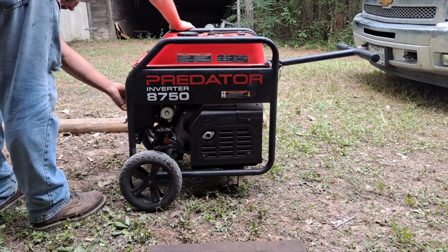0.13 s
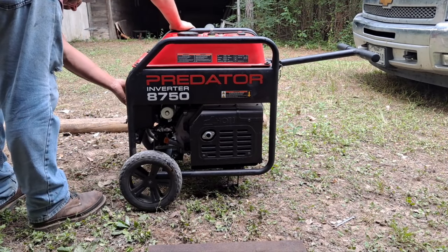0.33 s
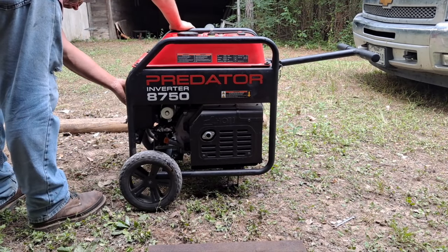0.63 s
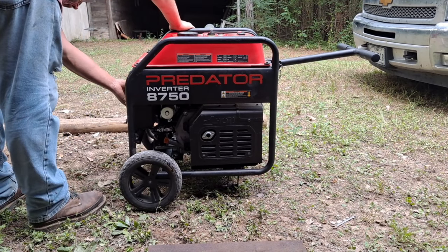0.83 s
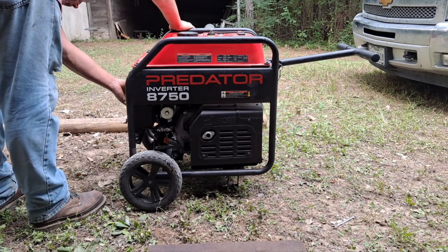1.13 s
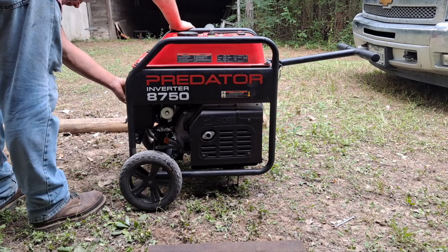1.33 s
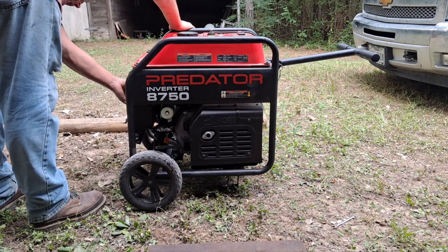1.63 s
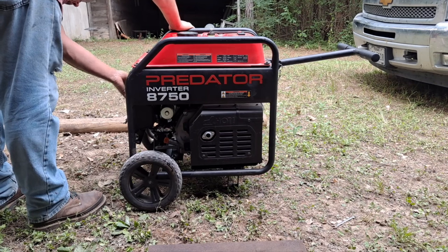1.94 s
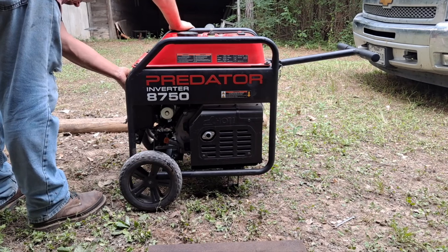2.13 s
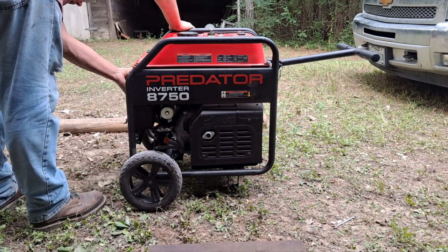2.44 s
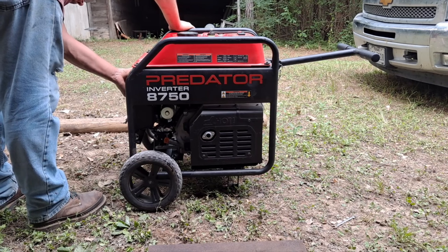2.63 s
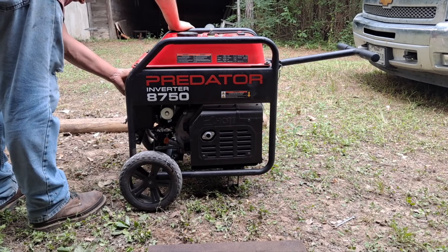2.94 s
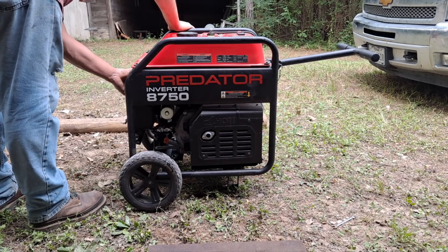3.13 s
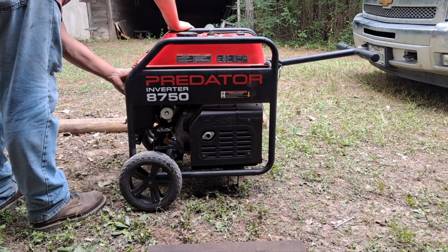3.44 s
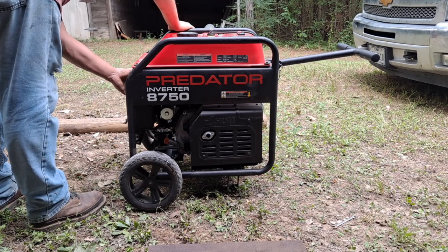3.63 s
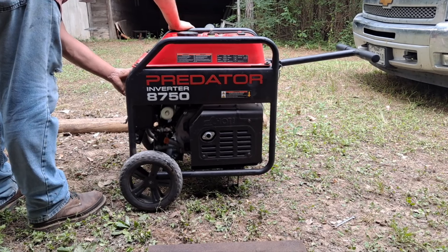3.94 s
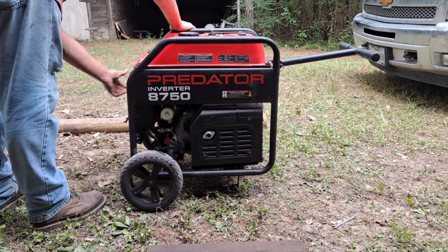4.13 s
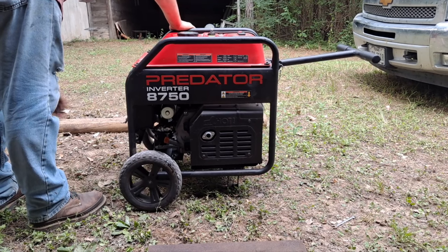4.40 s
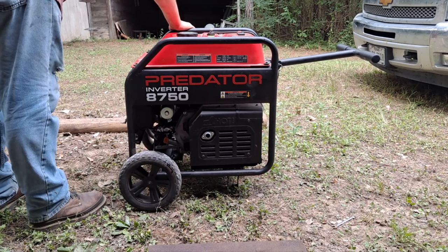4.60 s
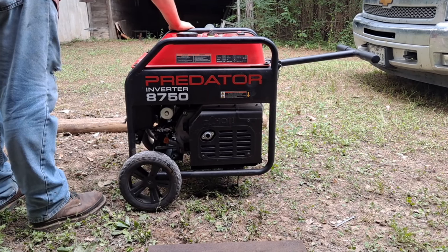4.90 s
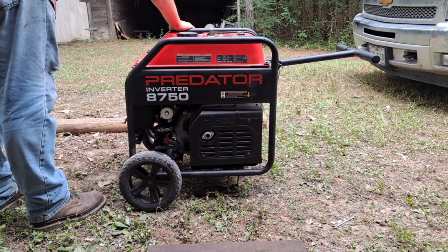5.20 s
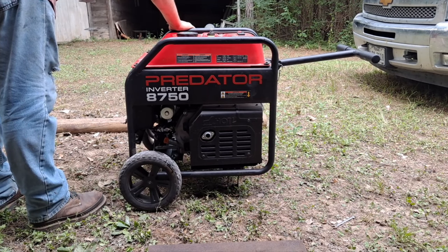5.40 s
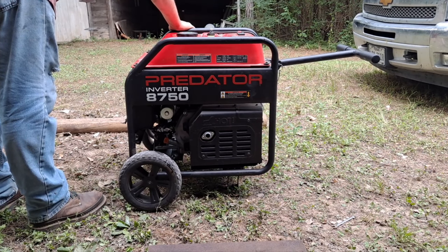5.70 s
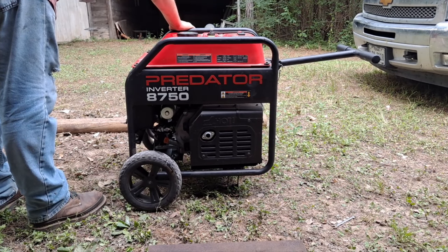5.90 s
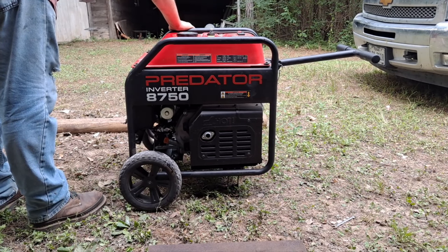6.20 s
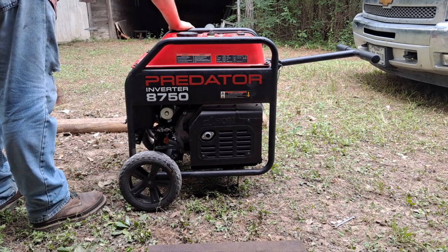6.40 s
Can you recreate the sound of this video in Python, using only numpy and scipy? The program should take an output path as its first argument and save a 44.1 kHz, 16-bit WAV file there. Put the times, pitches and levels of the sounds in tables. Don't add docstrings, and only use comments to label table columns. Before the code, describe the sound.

Quiet insect hiss and small panel taps, then a starter slams and grinds, and a generator engine catches loudly, races, sags and revs again.

```python
import sys
import numpy as np
from scipy import signal
from scipy.fft import rfft, irfft
from scipy.io import wavfile
from scipy.ndimage import map_coordinates

SR = 44100
rng = np.random.default_rng(int(sys.argv[2]) if len(sys.argv) > 2 else 0)


def inscribe(sig):
    pcm = np.round(np.clip(np.atleast_2d(sig).T, -1, 1) * 32767)
    wavfile.write(sys.argv[1], SR, pcm.astype(np.int16))


def nominal_scale(level):
    x = np.asarray(level, float) / 20
    return 10 ** x


N = 288855
TIME_S = np.arange(N) / SR
GRID_HZ = np.maximum(np.fft.rfftfreq(N, 1 / SR), 1)


def rms_one(x):
    return x / np.sqrt(np.mean(x ** 2) + 1e-20)


def in_time(rows):
    at_s, *columns = np.transpose(rows)
    return [np.interp(TIME_S, at_s, column) for column in columns]


def at_hz(points):
    hz, value = np.array(points).T
    return np.interp(np.log(GRID_HZ), np.log(hz), value)


def bump(hz, width_hz, db):
    return db / (1 + (2 * (GRID_HZ - hz) / width_hz) ** 2)


def drift(rate_hz):
    knots = rng.standard_normal(4000)
    return map_coordinates(knots, [TIME_S * 2 * rate_hz], order=3)


def swells(peak_s, peak_db, rise_s, fall_s):
    t = TIME_S[::64, None] - peak_s
    bells = nominal_scale(2 * peak_db) * np.exp(-2 * (t / np.where(t < 0, rise_s, fall_s)) ** 2)
    return np.interp(TIME_S, TIME_S[::64], np.sqrt(bells.sum(axis=1)))


def wavering_tone(hz, width_hz):
    phase = 2 * np.pi * np.cumsum(hz * np.ones(N)) / SR
    return rms_one(drift(width_hz / 2) * np.sin(phase) + drift(width_hz / 2) * np.cos(phase))


# freq [hz], left_lead [radians]
PORT_LEAD = [(60, 0.5), (550, 0.24), (1460, .5), (1900, -0.37), (2840, 0.67), (3700, 1.26), (5000, 0),
             (8000, 3.5), (15000, -0.4)]


def stereo_noise(colour_db, likeness, balance, grain_db):
    grains = rng.standard_normal((2, N)) * nominal_scale(grain_db * drift(120))
    mid, side = rfft(grains) * nominal_scale(colour_db)
    alike = np.clip(at_hz(likeness), -1, 1)
    tilt = nominal_scale(at_hz(balance) / 2)
    shared, apart = np.sqrt(1 + alike) * mid, np.sqrt(1 - alike) * side
    left = (shared + apart) * tilt * np.exp(1j * at_hz(PORT_LEAD))
    right = (shared - apart) / tilt
    out = irfft(np.array([left, right]), N)
    return out / np.sqrt(np.mean(out.mean(0) ** 2))


# freq [hz], width [hz], boost [db]
FRAME = [(530, 40, 8), (803, 60, 7), (1092, 20, 7), (1335, 40, 3), (1540, 40, 3), (2850, 110, 5),
         (3630, 120, 5), (5600, 200, 5), (7250, 150, 2), (7900, 300, 2)]
# freq [hz], width [hz], dip [db]
GROUND_DIP = (438, 47, -10)
# freq [hz], likeness [-1..1]
NEAR_LIKENESS = [(60, 1), (250, 1), (550, 0.75), (1100, 0.89), (2200, 0.33), (4500, 0.43), (8000, 0.12),
                 (15000, .15)]
# freq [hz], left_minus_right [db]
NEAR_BALANCE = [(60, -11), (130, -8), (290, -3), (640, -3), (1410, -1.0), (3100, 1), (6820, -5),
                (15000, -0.5)]


def machine_noise(spectrum, level_db, edge_db, treble_db, grain_db):
    colour_db = at_hz(spectrum) + sum(bump(*mode) for mode in FRAME) + bump(*GROUND_DIP)
    x = rfft(stereo_noise(colour_db, NEAR_LIKENESS, NEAR_BALANCE, grain_db))
    above_edge, above_treble = [1 / (1 + (corner_hz / GRID_HZ) ** 8) for corner_hz in (1900, 4700)]
    body = rms_one(irfft(x * (1 - above_edge), N))
    edge = rms_one(irfft(x * (above_edge - above_treble), N))
    treble = rms_one(irfft(x * above_treble, N))
    return nominal_scale(level_db) * (body + nominal_scale(edge_db) * edge + nominal_scale(treble_db) * treble)


def puffs(times_s, peak_db, hz, cycles, skew, turn):
    train = np.zeros((1, N))
    keep = times_s < TIME_S[-1]
    train[0, np.round(times_s[keep] * SR).astype(int)] = nominal_scale(peak_db[keep])
    t = np.arange(-900, 901) / SR
    swing = np.cos(2 * np.pi * hz * t - skew - turn * np.array([[-1], [1]]))
    shape = swing * np.exp(-(t * hz / cycles) ** 2)
    return signal.fftconvolve(train, shape, axes=1)[:, 900:N + 900]


def strikes(events, modes, rub_s, body_db):
    at_s, peak_db, crack_db = np.transpose(events)
    at = np.round(at_s * SR).astype(int)
    end, ring_end = at[-1] + SR // 4, SR * 4
    rub = rng.standard_normal((2, N))
    fading = [1, -nominal_scale(-60 / (rub_s * SR))]
    out = np.zeros((2, N))
    for hz, level_db, t60_s in modes:
        r, w = nominal_scale(-60 / (t60_s * SR)), 2 * np.pi * hz / SR
        luck_db = rng.normal(0, 3.0, (len(at), 2)).T
        blows = np.full((2, N), 1e-18)
        blows[:, at] = nominal_scale(peak_db + level_db + body_db + luck_db)
        pushed = signal.lfilter([1], fading, blows[:, :end]) * rub[0, :end]
        pushed = np.pad(pushed, ((0, 0), (0, ring_end - end))) + 1e-18
        out[:, :ring_end] += signal.lfilter([0, np.sin(w)], [1, -2 * r * np.cos(w), r * r], pushed)
    blows = np.zeros(N)
    blows[at] = nominal_scale(peak_db + crack_db)
    return out + rub * signal.lfilter([1], fading, blows)


# start_s [s], rate [four-stroke cycles/s]
SPEED = [(3.76, 5.9), (3.894, 6.13), (4.087, 10.41), (4.201, 16.02), (4.524, 27.34), (4.818, 27.35),
         (5.139, 25.35), (5.676, 23.66), (5.872, 21.51), (6.174, 23.84), (6.6, 23.4)]


def crank():
    at_s, rate = np.transpose(SPEED)
    t = np.arange(at_s[0], at_s[-1], 1 / SR)
    done = np.cumsum(np.interp(t, at_s, rate)) / SR
    pops_s = np.interp(np.arange(int(done[-1]) + 1), done, t)
    period_s = np.append(np.diff(pops_s), 0.043)
    cycle = np.interp(TIME_S, pops_s, np.arange(len(pops_s)), left=-1)
    return pops_s, period_s, cycle, in_time(SPEED)[0]


def exhaust(pops_s, period_s, flow_db, load_db, luck):
    catch_s, misfire_db = 4.1, -7.5
    flow_db, load_db = np.interp(pops_s, TIME_S, flow_db), np.interp(pops_s, TIME_S, load_db)
    pop_db = -7.5 + 0.37 * flow_db + 0.72 * load_db
    pop_db += misfire_db * (pops_s < catch_s) + 0.12 * luck[0]
    pop_db -= 0.025 * flow_db * luck[2]
    lean_db = pop_db - 16 - 0.3 * flow_db
    after_db = pop_db - 6.5 + 0.13 * flow_db
    out = puffs(pops_s, pop_db, hz=234.0, cycles=0.61, skew=-0.017, turn=0.14)
    out += puffs(pops_s + 0.268 * period_s, after_db, hz=240, cycles=0.51, skew=0.16, turn=0.28)
    out += puffs(pops_s + 0.55 * period_s, pop_db - 5.5, hz=213, cycles=0.3, skew=0.95, turn=0.19)
    out += puffs(pops_s - 0.009, lean_db - 3.0, hz=182, cycles=0.71, skew=0.18, turn=0.27)
    out += puffs(pops_s, lean_db + 0.27, hz=325, cycles=1.47, skew=0.13, turn=0.14)
    return out * nominal_scale([[-1.5], [1.5]])


def valve_thump(pops_s, period_s, thump_db, luck):
    peak_db = np.interp(pops_s, TIME_S, thump_db) - 3.5 + 0.52 * luck[1]
    thump = puffs(pops_s - 0.275 * period_s, peak_db, hz=117, cycles=0.57, skew=1.68, turn=0.75)
    return thump * nominal_scale([[-2.5], [2.0]])


# peak_s [s], peak_db [db], spread_s [s]
LABOURS = [
    (3.92, -23, .04),
    (4.04, -20, .04),
    (4.2, -24, .12),
    (4.785, -19.5, .02),
    (4.97, -21, .02),
    (5.32, -37, 0.068),
    (5.73, -19.5, .07),
    (5.85, -20, 0.077),
]


def intake_boom(pops_s):
    peak_s, peak_db, spread_s = np.transpose(LABOURS)
    gain = np.interp(pops_s, TIME_S, swells(peak_s, peak_db, spread_s, spread_s))
    boom_db = 20 * np.log10(gain + 1e-9)
    return puffs(pops_s - 0.005, boom_db, hz=78, cycles=0.87, skew=0.3, turn=0.5) * nominal_scale([[-4.0], [3.5]])


# order [per cycle], level_db [db re thump], lag [cycles], left_minus_right [db]
LOW_ORDERS = [(2, -19, 0.31, -6), (5, -13, 0.042, 8)]


def block_tones(cycle, thump_db):
    tones = np.zeros((2, N))
    for order, level_db, lag_cycles, pan_db in LOW_ORDERS:
        side_gain = nominal_scale(level_db + np.array([[pan_db / 2], [-pan_db / 2]]))
        tones += side_gain * np.cos(2 * np.pi * order * (cycle - lag_cycles))
    return nominal_scale(thump_db) * np.clip((TIME_S - 4.05) / 0.27, 0, 1) * tones


# freq [hz], density [db per hz]
JET = [(290, 1), (500, -9), (2330, -2), (2890, 1.5), (4150, -5), (5550, -4), (6800, -8.5), (8330, -6),
       (10800, -22.5), (13300, -13), (16000, -24)]


def gas_jet(pops_s, period_s, cycle, flow_db, luck):
    opens_s = pops_s - 0.36 * period_s
    last = np.maximum(np.searchsorted(opens_s, TIME_S) - 1, 0)
    since_cycles = (TIME_S - opens_s[last]) / period_s[last]
    fade_db = -38 * np.maximum(since_cycles - 0.2, 0) + 0.13 * luck[2][last]
    gate = np.clip(since_cycles / 0.016, 0, 1) * nominal_scale(fade_db) * (cycle > 0)
    jet = stereo_noise(at_hz(JET) + bump(15900, 1500, 5), NEAR_LIKENESS, NEAR_BALANCE, grain_db=0.65)
    return jet * gate * nominal_scale(-13.5 + np.interp(pops_s, TIME_S, flow_db)[last])


# freq [hz], density [db per hz]
CLATTER = [(40, -1), (100, -10), (330, -5.5), (600, 0.5), (1000, 1.5), (2000, -0.5), (3000, -4.5),
           (4500, -10), (6500, -12.5), (8500, -11), (10500, -26), (13000, -18), (16000, -24.5)]


def running_clatter(cycle, flow_db, load_db):
    tappet_db = 2.0 * np.cos(2 * np.pi * (cycle - 0.05))
    level_db = -22.5 + load_db + 0.62 * drift(9) + 0.18 * tappet_db
    edge_db, treble_db = -2 + 0.29 * load_db, -5.5 + 0.22 * flow_db + tappet_db
    clatter = machine_noise(CLATTER, level_db, edge_db, treble_db, grain_db=1.0)
    return clatter * np.clip((TIME_S - 3.95) / 0.19, 0, 1)


# start_s [s], gas_flow [db re wide open]
THROTTLE = [(3.76, -41), (4.05, -11), (4.14, -0.5), (4.25, 0), (4.53, -2.5), (4.61, -16.5), (4.78, -29.5),
            (5.2, -34.5), (5.5, -24.5), (5.87, -28), (5.91, -4), (6.05, -8.5), (6.2, -20.5), (6.55, -27)]
# start_s [s], load [db]
LOAD = [
    (3.95, -5.5),
    (4.25, -0.2),
    (4.43, -0.1),
    (5.69, -3),
    (6.0, -0.5),
    (6.45, -0.5),
]


def engine():
    pops_s, period_s, cycle, rate = crank()
    (flow_db,), (load_db,) = in_time(THROTTLE), in_time(LOAD)
    luck = rng.normal(0, 1, (len(pops_s), 3)).T
    thump_db = -14 + 0.23 * flow_db + 0.21 * load_db
    thump_db -= 0.07 * np.maximum(rate - 15.2, 0)
    out = exhaust(pops_s, period_s, flow_db, load_db, luck)
    out += valve_thump(pops_s, period_s, thump_db, luck) + intake_boom(pops_s)
    out += block_tones(cycle, thump_db)
    out += gas_jet(pops_s, period_s, cycle, flow_db, luck)
    return out + running_clatter(cycle, flow_db, load_db)


# start_s [s], peak_db [db], dry_crack [db re peak]
PINION = [
    (2.647, -19, -15.5),
    (2.65, -31, -22),
    (2.667, -15.5, 1.5),
    (2.683, -29, -14),
    (2.695, -7, -15),
    (2.719, -8, -26),
]
# freq [hz], level_db [db], t60_s [s]
HOUSING = [(167.7, -3, 0.54), (254.7, -5.5, 0.91), (329, 3, 0.86), (800, -14, 0.065), (860, -16, 0.26),
           (1056, -3, 0.13), (1560, 11, 0.06), (2200, -7, 0.039), (2920, -14, .06), (3340, -13, 0.073),
           (3630, 7, 0.086), (4780, 7, 0.064), (7600, -11, 0.02), (8130, -19, 0.032), (12600, -18, 0.022)]
# freq [hz], density [db per hz]
GRIND = [(59, -41), (100, -14), (315, -15), (406, -15.5), (547, -5), (818, -3.5), (1200, -5), (2080, -5.5),
         (2370, -6.5), (2800, -7.5), (6150, -14.5), (7940, -9.5), (10700, -29), (15000, -19), (16000, -42)]
# peak_s [s], extra_grind [db]
HEAVES = [
    (2.72, -22.5),
    (2.947, -25),
    (3.187, -29.5),
    (3.413, -30),
    (3.671, -28.5),
    (3.88, -29.5),
    (4.012, -22),
]


def starter():
    engage_s, release_s, coast_end_s = 2.646, 3.715, 4.16
    grind_steady_db, slam_db, slam_s = -26.5, -21, 0.1
    tooth_start_hz, tooth_top_hz, spin_up_s = 1157, 2187, 0.17
    since_s = np.maximum(TIME_S - engage_s, 0)
    coasting = np.clip((TIME_S - release_s) / 0.046, 0, 1)
    engaged = np.clip(since_s / 0.006, 0, 1) * np.clip((coast_end_s - TIME_S) / 0.045, 0, 1)

    heave_s, heave_db = np.transpose(HEAVES)
    slam = nominal_scale(slam_db) * np.exp(-(since_s / slam_s) ** 2)
    heave = swells(heave_s, heave_db, rise_s=0.051, fall_s=0.024)
    grind_db = 20 * np.log10(np.sqrt(nominal_scale(grind_steady_db) ** 2 + slam ** 2 + heave ** 2))
    spun = 1 - np.exp(-(since_s / 0.21) ** 2)
    tint_db = 0.44 * (grind_steady_db - grind_db) - 6 * (1 - spun)
    bite_db = 9 * np.exp(-since_s / 0.041)
    edge_db = 2.5 - 6 * coasting + tint_db + bite_db
    treble_db = -5 - 3 * coasting + tint_db + 2.07 * bite_db
    grind = machine_noise(GRIND, grind_db - 0.3 * coasting, edge_db, treble_db, grain_db=1.0)

    sag = swells(heave_s + 0.085, 0 * heave_db, 0.054, 0.054)
    climb = np.exp(-np.maximum(since_s - 0.085, 0) / spin_up_s)
    tooth_hz = (tooth_top_hz - (tooth_top_hz - tooth_start_hz) * climb) * (1 - 0.06 * sag)
    whine_gain = nominal_scale(-30 - sag) * (1 - np.exp(-(since_s / 0.14) ** 3)) * (1 - coasting)
    whine = wavering_tone(tooth_hz, width_hz=230)
    whine = whine + 0.59 * wavering_tone(tooth_hz, width_hz=350) * [[1], [-1]]
    whine += nominal_scale(-6) * wavering_tone(1.48 * tooth_hz, width_hz=300)
    armature = spun ** 3 * nominal_scale(-16.5) * wavering_tone(tooth_hz / 15, width_hz=38)
    slams = strikes(PINION, HOUSING, rub_s=0.012, body_db=-40.5)
    return engaged * (grind + whine_gain * (whine + armature)) + slams


# start_s [s], peak_db [db], dry_tick [db re peak]
SWITCH = [
    (0.119, -55, -20),
    (1.664, -46, -6),
    (2.221, -49, -25),
    (2.244, -45, -25),
    (2.408, -33, -23),
    (2.424, -43, -22),
    (2.449, -42, -18),
    (2.469, -54, -20),
]
# freq [hz], level_db [db], t60_s [s]
PANEL = [(644, -15, 0.027), (885, 1.5, 0.037), (980, -5, .02), (1390, -1, 0.026), (1790, -8, .012),
         (2380, 0, .012), (3000, -1, .012), (3380, -1, 0.013)]


def switch():
    return strikes(SWITCH, PANEL, rub_s=0.042, body_db=-30.5)


# freq [hz], likeness [-1..1]
FAR_LIKENESS = [(60, 0.49), (180, 1), (550, 0.29), (1650, -0.23), (4970, 0.12), (15000, -0.29)]
# freq [hz], left_minus_right [db]
FAR_BALANCE = [(60, -17), (130, -13), (290, -6.5), (640, -9), (1410, -10), (3100, -2.5), (6820, -6),
               (15000, -1)]
# freq [hz], density [db per hz]
BREEZE = [(12, -59), (20, -18), (57, -7), (75, 0), (102, -8.5), (129, -7.5), (156, -17), (211, -11.5),
          (248, -17), (400, -33.5), (520, -69), (880, -120)]
# peak_s [s], peak_db [db], length_s
# [s]
LOW_SWELLS = [(0.103, -49.5, 0.48), (0.716, -50, 0.11), (1.013, -53, 0.18), (1.31, -53, 0.032),
              (1.59, -46.5, .08), (2.028, -49, 0.088), (2.41, -45, 0.32), (3.15, -48, 0.22), (3.502, -38.5, .06),
              (3.735, -36.5, .06), (4.247, -28, 0.28), (5.35, -36.5, 0.17), (5.896, -27, 0.12), (6.18, -39, .15)]


def breeze():
    peak_s, peak_db, length_s = np.transpose(LOW_SWELLS)
    wind = np.hypot(nominal_scale(-49), swells(peak_s, peak_db, 0.84 * length_s, 0.57 * length_s))
    colour_db = at_hz(BREEZE) + bump(49.5, 18, 4.7)
    return wind * nominal_scale(1.3 * drift(9)) * stereo_noise(colour_db, FAR_LIKENESS, FAR_BALANCE, grain_db=-3.0)


# freq [hz], density [db per hz]
CRICKET = [(1800, -43), (2300, -18.5), (5000, -28), (6000, -31.5), (6500, -11), (7000, -9.5), (7650, -5.5),
           (8300, -13), (9000, -36), (10500, -42), (13500, -32), (16000, -44)]


def cricket():
    stroke = 0.401 + 18.732 * TIME_S - 19.67 * np.exp(-TIME_S / 0.5526)
    throb = nominal_scale(10 * (np.cos(2 * np.pi * stroke) - 1))
    from_s, grow_s = 0.69, 0.64
    fade_in = 1 - np.exp(-(np.maximum(TIME_S - from_s, 0) / grow_s) ** 1.2)
    song = stereo_noise(at_hz(CRICKET), FAR_LIKENESS, FAR_BALANCE, grain_db=1.5)
    return nominal_scale(-51.5) * fade_in * throb * song


# freq [hz], density [db per hz]
CHORUS = [(250, -15), (450, -10.5), (600, -8), (850, -9.5), (1150, -16.5), (1700, -16.5), (2200, -16.5),
          (3350, -6.5), (5600, -6.5), (8600, -4.5), (9300, -17.5), (10800, -20), (11800, -29), (16000, -22)]
# start_s [s], level_db [db]
CHORUS_SWELL = [
    (0, -55),
    (.3, -58.5),
    (.5, -59.5),
    (1.35, -60),
    (2.0, -56.5),
    (2.5, -55),
]


def chorus():
    hiss = stereo_noise(at_hz(CHORUS), FAR_LIKENESS, FAR_BALANCE, grain_db=0.4)
    return nominal_scale(in_time(CHORUS_SWELL)[0]) * hiss


def traffic_hum():
    dip_db = -5.5 * np.exp(-((TIME_S - 0.17) / 0.09) ** 2)
    fall_db = -350 * np.clip(TIME_S - 0.29, 0, 1)
    tone = np.sin(2 * np.pi * np.cumsum(79 + 5 * drift(8)) / SR)
    return nominal_scale(-34.5 + dip_db + fall_db) * tone * nominal_scale(1.0 + 1.5 * drift(20)) * nominal_scale([[-3.5], [3.0]])


def scene():
    return engine() + starter() + switch() + breeze() + cricket() + chorus() + traffic_hum()


def low_pass(x):
    return signal.sosfilt(signal.butter(12, 16300, fs=SR, output="sos"), x)


def record(dry):
    low_cut = signal.butter(4, 42, "high", fs=SR, output="sos")
    mix = 1.392 * np.tanh(signal.sosfilt(low_cut, dry) / 1.396)
    return low_pass(mix)


dry = scene()
out = record(dry)
inscribe(out)
```